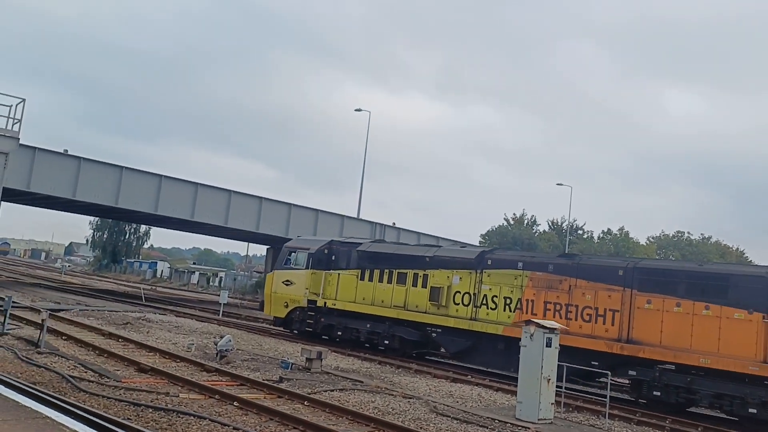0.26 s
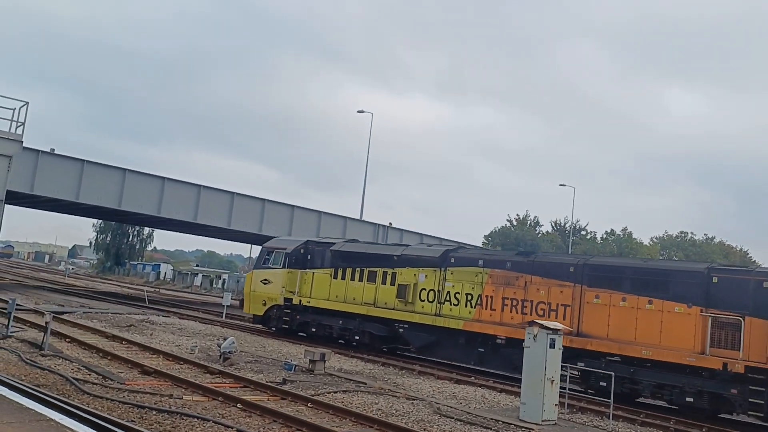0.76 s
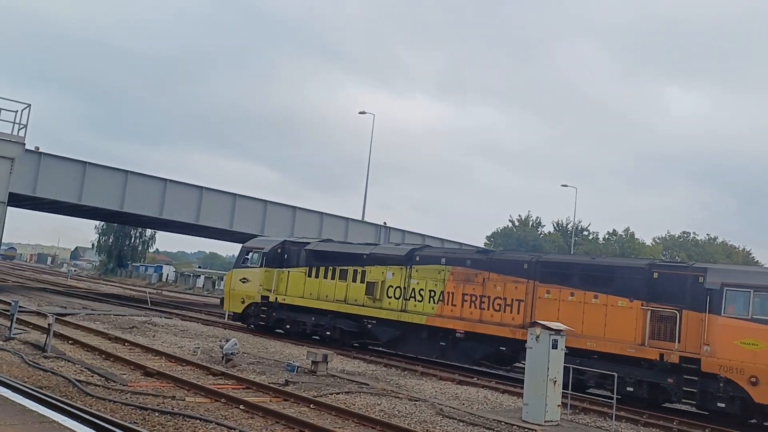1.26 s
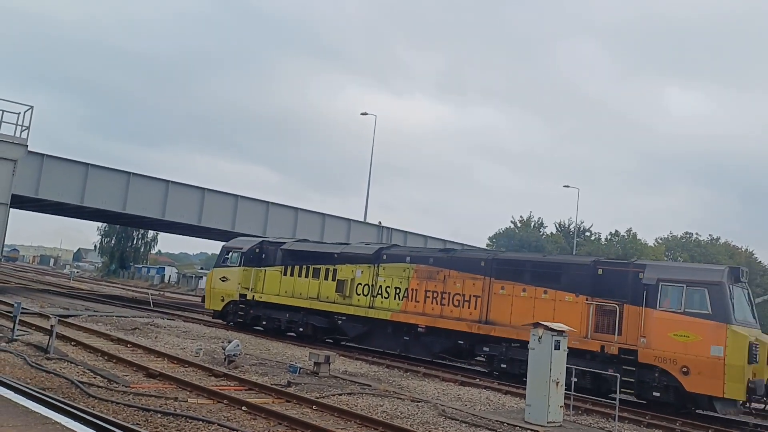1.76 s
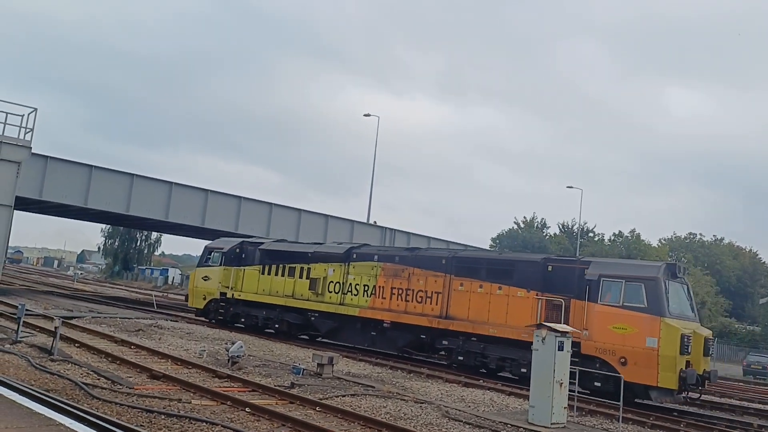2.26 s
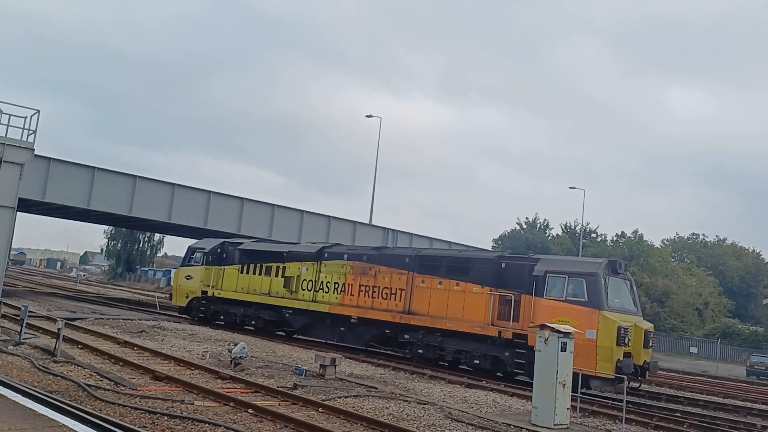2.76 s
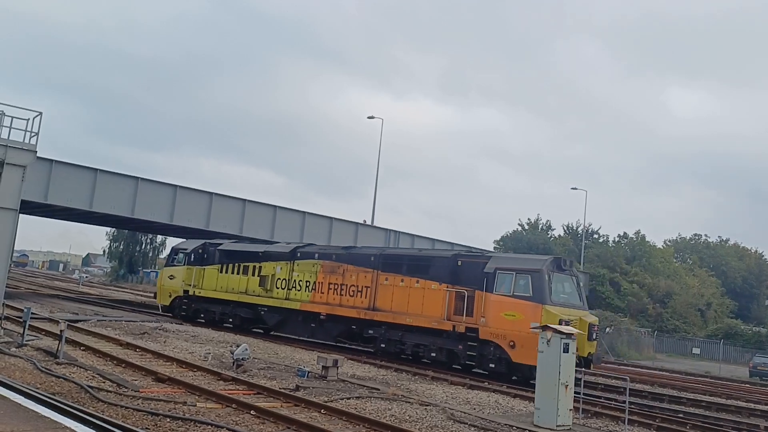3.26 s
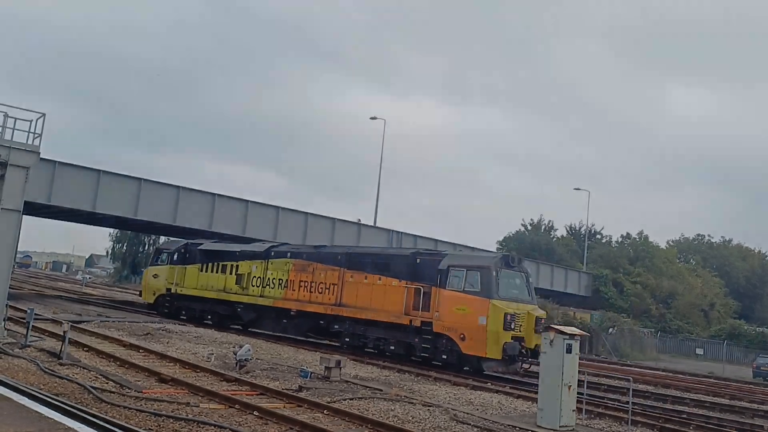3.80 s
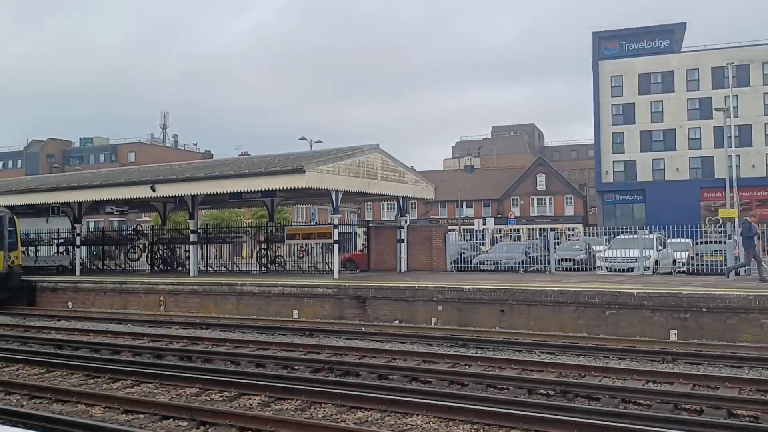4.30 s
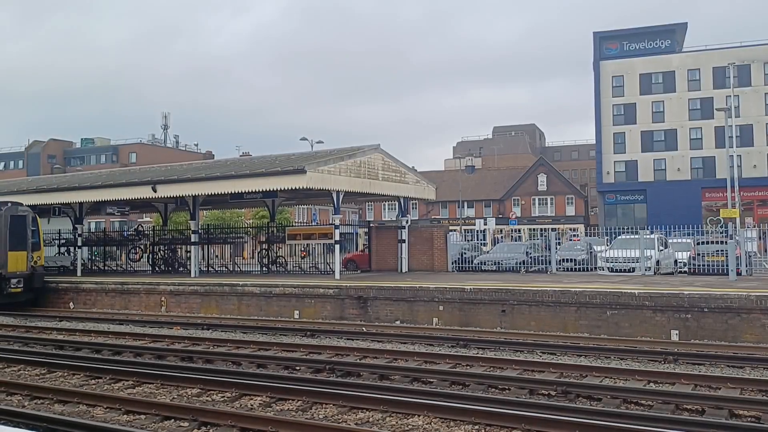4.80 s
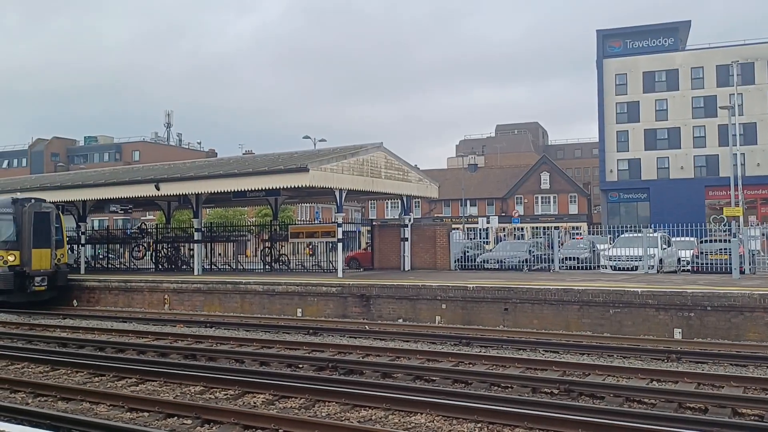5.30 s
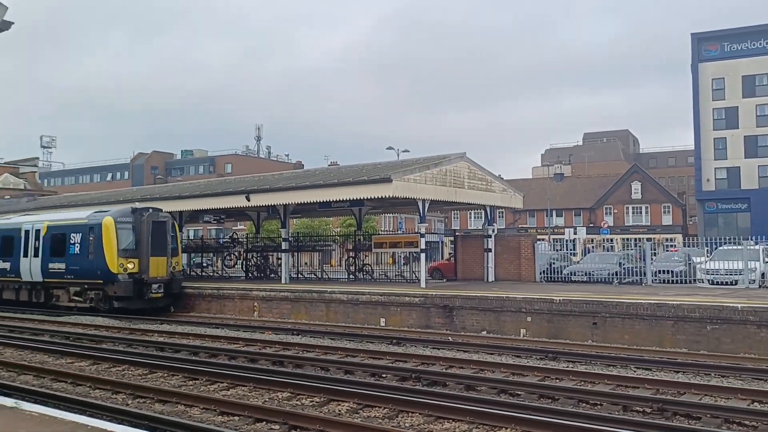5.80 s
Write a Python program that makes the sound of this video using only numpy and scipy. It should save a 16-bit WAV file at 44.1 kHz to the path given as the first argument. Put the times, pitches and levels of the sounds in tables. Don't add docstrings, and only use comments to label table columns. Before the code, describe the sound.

A trackside stereo microphone catches a throbbing diesel drone and broad wheel rumble. One piercing metallic squeal rings out early, followed by a cluster of heavy thumps, clatter and hollow booms as the locomotive crosses points. It eases away, fades and stops abruptly. After a tiny gap, a platform scene opens with softer diesel hum; an electric train approaches, its wheels hissing louder, with a joint thump, brief motor whine and faint brake rub.

```python
import sys
import numpy as np
from scipy import signal
from scipy.fft import rfft, irfft, next_fast_len
from scipy.io import wavfile
from scipy.ndimage import map_coordinates

SR = 44100
rng = np.random.default_rng(int(sys.argv[2]) if len(sys.argv) > 2 else 0)


def inscribe(sig):
    pcm = np.round(np.clip(np.atleast_2d(sig).T, -1, 1) * 32767)
    wavfile.write(sys.argv[1], SR, pcm.astype(np.int16))


def attenuation_scalar(level_db):
    decades = np.asarray(level_db, float) / 20
    return 10 ** decades


N = 266805
YARD_S, PLATFORM_S = (0, 4.0575), (4.222, 6.05)


def rms_one(x):
    return x / np.sqrt(np.mean(x ** 2) + 1e-20)


def in_time(rows, outside=None):
    s, *columns = np.transpose(rows)
    return [np.interp(np.arange(N) / SR, s, c, outside, outside) for c in columns]


def at_hz(points, hz):
    table_hz, value = np.array(points).T
    return np.interp(np.log(hz), np.log(table_hz), value)


def drift(rate, size=N):
    r = np.exp(-80 * np.pi * rate / SR)
    luck = rng.standard_normal(size // 40 + 2002)
    slow = signal.lfilter([1], [1, -2 * r, r * r], luck)[2000:]
    return np.interp(np.arange(size) / 40, np.arange(len(slow)), rms_one(slow))


def ring(drive, hz, t60):
    r, w = attenuation_scalar(-60 / (t60 * SR)), 2 * np.pi * hz / SR
    return signal.lfilter([0, np.sin(w)], [1, -2 * r * np.cos(w), r * r], drive + 1e-18)


def swell(start, attack, hold, db, fall_db):
    t = np.arange(N) / SR - start
    return np.clip(t / attack, 0, 1) * attenuation_scalar(db - fall_db * np.maximum(t - attack - hold, 0))


def tone(hz, gain, wobble_db, wander_hz):
    gain = gain * attenuation_scalar(wobble_db * drift(8.4))
    pitch = hz + wander_hz * drift(7.94)
    return np.sqrt(2) * gain * np.sin(2 * np.pi * np.cumsum(pitch) / SR)


# time_s, cycle_hz
ENGINE_CYCLE = [(0, 5.82), (1.5, 5.805), (4.1, 5.78), (4.2, 5.768), (6.05, 5.762)]
ENGINE_ORDERS = 7, 8, 9, 10, 11, 12, 13, 14, 15, 16, 17, 18, 19, 21, 22, 23, 24, 25, 26
# yard_start_db, yard_end_db, platform_db (rms)
ENGINE_LEVELS = [(-55.5, -61, -43), (-30.5, -39.5, -57.5), (-29.5, -53.5, -47), (-46.5, -53, -37.5),
                 (-21, -33, -37.5), (-42, -36.5, -44), (-28.5, -19, -26.5), (-43, -42, -34),
                 (-35.5, -33, -31.5), (-46.5, -39.5, -44.5), (-49.5, -58.5, -44.5), (-48.5, -47, -52),
                 (-28.5, -67, -45), (-44.5, -35.5, -34), (-50.5, -39, -56), (-46, -42, -45),
                 (-34, -34, -38), (-56.5, -39, -60), (-49, -49, -54)]
ECHO_ORDERS = 8, 11, 13, 15
# yard_share, yard_crest_s, platform_share, platform_crest_s
ENGINE_ECHOES = [(.3, 2.5, .1, 5.0), (0.059, .75, .2, 4.55), (0.48, 2.556, .35, 4.93),
                 (0.23, 2.82, .4, 5.3)]


def diesel():
    cycle, t = in_time(ENGINE_CYCLE)[0], np.arange(N) / SR
    turn, yard = 2 * np.pi * np.cumsum(cycle) / SR, t < YARD_S[1]
    pipe_smear = np.pi / 8
    yard_shift, platform_shift = .0152, .0175
    out = 0
    for order, (start_db, end_db, platform_db) in zip(ENGINE_ORDERS, ENGINE_LEVELS):
        db, = in_time([(0, start_db), (YARD_S[1], end_db), (PLATFORM_S[0], platform_db)])
        phase = order * turn + pipe_smear * order ** 2
        if order not in ECHO_ORDERS:
            out = out + attenuation_scalar(db + 1.6 * drift(1.2)) * np.sin(phase)
            continue
        share, crest, far_share, far_crest = ENGINE_ECHOES[ECHO_ORDERS.index(order)]
        shift = np.where(yard, yard_shift * (t - crest), platform_shift * (t - far_crest))
        echo = np.sin(phase + 2 * np.pi * shift * order * cycle)
        out = out + attenuation_scalar(db) * (np.sin(phase) + np.where(yard, share, far_share) * echo)
    return np.sqrt(2) * out


# time_s, pitch_hz
GEAR_PITCH = [(0, 224), (1, 243), (2, 257), (2.9, 269)]
# time_s, level_db (rms)
GEAR_LOAD = [(0, -34), (.6, -30), (1.4, -27), (2.2, -29), (2.9, -40)]
# start_s, hold_s, level_db (rms)
BODY_BOOMS = [
    (2.006, .2, -18),
    (2.36, 0.31, -24.5),
    (2.781, 0.077, -20.5),
    (3.047, 0.077, -24),
    (3.42, .12, -29),
    (3.675, 0.33, -26.5),
]


def whines():
    gear_hz, = in_time(GEAR_PITCH)
    gear_load, = in_time(GEAR_LOAD, outside=-120)
    jolts = np.max([swell(s, .075, hold, db, 69.5) for s, hold, db in BODY_BOOMS], axis=0)
    out = tone(gear_hz, attenuation_scalar(gear_load), 2.2, 0.51)
    out += tone(1.365 * gear_hz, swell(0, .2, .1, -32, 17), 2.7, 0.9)
    out += tone(277.3, jolts, 2.2, .7)
    out += tone(623, swell(0, .01, .01, -45, 1.5), 2.5, 2.5)
    out += tone(186, swell(2.68, .07, .06, -23, 70), 1.5, .6)
    out *= np.arange(N) / SR < YARD_S[1]
    return out + tone(242, swell(5.35, .25, .06, -30, 60), 1.5, 0.27)


def inverter():
    return tone(1268, swell(5.58, .04, .02, -39, 10), 1.8, 3.0) * [[.6], [1.3]]


# time_s, thump_peak_db, clatter_db
RAIL_JOINTS = [(1.963, -24.5, -24), (2.067, -3, -26), (2.655, -24, -29), (2.784, -4.5, -41),
               (2.835, -10, -28), (3.06, -9, -24), (3.286, -14, -18.5), (3.324, -17, -29.5),
               (3.382, -6.5, -20.5), (3.474, -19, -40), (5.268, -31, -30), (5.608, -9, -34)]
# pitch_hz, level_db, t60_s
RAIL_AND_BOGIE = [(189, -2.5, 0.082), (253, 9, 0.076), (297, -10, 0.037)]


def joints():
    out, blows, clatter = np.zeros(N), np.zeros(N), np.zeros(N)
    fade = np.exp(-np.arange(2000) / 450)
    for s, db, bright_db in RAIL_JOINTS:
        i = round(s * SR)
        blows[i] = attenuation_scalar(db - 16)
        clatter[i:i + 2000] += attenuation_scalar(bright_db - 5) * rng.standard_normal(2000) * fade
    for hz, db, t60 in RAIL_AND_BOGIE:
        out += attenuation_scalar(db) * ring(blows, hz, t60)
    soft = signal.sosfilt(signal.butter(2, 420, fs=SR, output="sos"), out)
    band = signal.butter(4, [400, 2200], "band", fs=SR, output="sos")
    return soft + 1.4 * signal.sosfilt(band, clatter)


def load(bogies, nearness, shares):
    t = np.arange(N) / SR
    bumps = sum(np.outer([rumble_db, grind_db], np.exp(-((t - s) / half) ** 2))
                for s, half, rumble_db, grind_db in bogies)
    rumble_shares, grind_shares = (0.19, 0.99, 0.057, .02), (.1, 0.011, 0.47, 1.0)
    return np.transpose([rumble_shares, grind_shares, shares]) @ np.vstack([bumps, in_time(nearness)])


def rolling(span, levels, centres_hz, colour, peaks, alike, pan, patchy_db):
    start, size = round(span[0] * SR), round((span[1] - span[0]) * SR)
    length = next_fast_len(size)
    hz = np.maximum(np.arange(length // 2 + 1) * SR / length, 1)
    shape_db = at_hz(colour, hz)
    shape_db = shape_db + sum(db / (1 + (2 * (hz - f) / width) ** 2) for f, width, db in peaks)
    mid, side = rfft(rng.standard_normal((2, length)))
    like = np.clip(at_hz(alike, hz), -.99, .99)
    pair = np.sqrt(1 + like) * mid + np.sqrt(1 - like) * side * [[1], [-1]]
    pair = pair * attenuation_scalar(at_hz(pan, hz) / 2 * [[1], [-1]])
    pair = pair * attenuation_scalar(shape_db) * np.sqrt(SR / 4)
    levels = levels[:, start:start + size]
    levels = levels - np.median(levels, axis=1, keepdims=True)
    levels = np.vstack([levels, np.minimum(levels[2], 0)])
    out, together = np.zeros((2, N)), drift(18, size=size)
    for centre in 25 * 2 ** np.arange(0, 10, .5):
        window = np.clip(1 - 2 * np.abs(np.log2(hz / centre)), 0, 1)
        shares = [np.interp(np.log(centre), np.log(centres_hz), row) for row in np.eye(5)]
        flicker_db = patchy_db * (.4 * together + drift(14, size=size))
        gain = attenuation_scalar(shares @ levels + flicker_db)
        out[:, start:start + size] += gain * irfft(pair * window, length)[:, :size]
    return out


# time_s, half_length_s, rumble_db, grind_db
YARD_BOGIES = [
    (.05, .15, 5, 0.5),
    (1.6, .2, -6.5, -0.6),
    (2.13, 0.15, 5, 0),
    (3.0, 1.37, 4.5, -4.5),
    (2.8, 0.13, 8, .5),
    (3.36, .13, 7, 2.5),
]
# time_s, level_db
YARD_NEARNESS = [(0, -4.5), (3.3, -4.5), (4.061, -8)]
YARD_CENTRES = [120, 230, 700, 3000, 14000]
# pitch_hz, level_db (per Hz)
YARD_NOISE = [(20, -72), (33, -69), (45, -58), (70, -53),
              (100, -51), (160, -51), (210, -48), (300, -51.5), (400, -68), (640, -60), (1300, -67.5),
               (1700, -75.5), (4000, -86.5), (7000, -89), (9500, -100.2), (15800, -103.4)]
# pitch_hz, width_hz, level_db
YARD_PEAKS = [(415, 140, 1.5), (963.6, 41, -14), (1280, 108, 6.5), (2770, 310, 5), (4860, 160, 6),
              (5880, 230, 9), (9760, 1500, -7), (11800, 2000, 1.5)]
# pitch_hz, likeness (-1 to 1)
YARD_ALIKE = [(60, -0.67), (130, 0.98), (290, 0.91), (640, 0.78), (1410, 0.52), (3100, 0.55), (6820, 0.11),
              (15000, 0.3)]
# pitch_hz, level_db
YARD_PAN = [(60, -3.5), (110, 2.5), (200, -0.7), (380, 0.4), (700, -1.6), (1290, -3), (2380, 0),
            (4400, -3.5), (8120, -1.2), (15000, -1.5)]


def locomotive_rolling():
    levels = load(YARD_BOGIES, YARD_NEARNESS, shares=(0.66, .05, 0.31, 1.0))
    return rolling(YARD_S, levels, YARD_CENTRES, YARD_NOISE, YARD_PEAKS,
                   YARD_ALIKE, YARD_PAN, patchy_db=.8)


# time_s, half_length_s, rumble_db, grind_db
PLATFORM_BOGIES = [
    (4.38, 0.12, 6.3, 0.38),
    (5.62, 0.034, 4.1, 0.37),
]
# time_s, level_db
PLATFORM_NEARNESS = [(4.22, -8), (4.9, -6.5), (5.23, -6.5), (5.28, -1), (5.6, 1), (5.7, -.5), (5.92, 1),
                     (6.05, -.5)]
PLATFORM_CENTRES = [120, 250, 800, 5500, 8200]
# pitch_hz, level_db (per Hz)
PLATFORM_NOISE = [(20, -75), (33, -64), (45, -59), (70, -52),
                  (100, -50.5), (160, -60.5), (250, -52.5), (350, -61), (600, -66), (1300, -70.5),
                   (2200, -80), (5500, -89.5), (7000, -97.5), (9300, -104.6), (12000, -104.5),
                   (15800, -106.8)]
# pitch_hz, width_hz, level_db
PLATFORM_PEAKS = [(176, 25, 1), (3220, 1100, 1.3), (5560, 630, 5.9), (7740, 590, 4.6)]
# pitch_hz, likeness (-1 to 1)
PLATFORM_ALIKE = [(60, 0.68), (130, 0.86), (290, 0.97), (640, 0.51), (1400, 0.45), (3100, 0.71),
                  (6800, 0.04), (15000, .3)]
# pitch_hz, level_db
PLATFORM_PAN = [(60, 3), (110, 0), (200, 0.5), (380, 0), (700, -1.5), (1290, -5), (2380, -7), (4400, -13),
                (8120, 4), (15000, 8.5)]


def train_rolling():
    levels = load(PLATFORM_BOGIES, PLATFORM_NEARNESS, shares=(.5, .1, .35, 1.1))
    return rolling(PLATFORM_S, levels, PLATFORM_CENTRES, PLATFORM_NOISE, PLATFORM_PEAKS,
                   PLATFORM_ALIKE, PLATFORM_PAN, patchy_db=.7)


# start_s, hold_s, pitch_hz, glide_hz_per_s, level_db (rms)
SUNG_NOTES = [
    (0.84, 0.0084, 2725, -300, -34.5),
    (0.877, 0.068, 2165, -200, -36),
    (0.957, 0.11, 1884, 293.5, -39),
]


def sung_notes():
    out, t = 0, np.arange(N) / SR
    for s, hold, hz, glide, db in SUNG_NOTES:
        pitch = hz + glide * np.clip(t - s, 0, .2)
        out = out + tone(pitch, swell(s, 0.021, hold, db, 255), 3.1, 2.4)
    s, hold, hz, glide, db = SUNG_NOTES[0]
    overtones = sum(np.sin(2 * np.pi * k * hz * t) / k ** .5 for k in range(2, 6))
    return out + swell(s, .015, .003, db - 3, 698.5) * overtones


# start_s, attack_s, hold_s, level_db, fall_db_per_s
FLANGE_BITES = [
    (.842, .022, .1, 1.5, 80),
    (1.25, .03, .03, -15, 130),
]
WHEEL_PITCHES = (2579, 3235, 3806, 4032, 4385, 4705, 5010, 5389, 5660, 6372, 6645, 7133, 7897, 8272, 8683,
                 9950, 10223, 10966, 11466, 11978, 12532, 13119, 13920, 14112, 14174, 14648, 14739, 15235,
                 15493)
# level_db (rms), t60_s
WHEEL_RINGS = [(-44.5, .5), (-46.5, 0.9), (-40.5, 1.22), (-50.5, 1.5), (-67, .8), (-44, 0.3), (-43, 0.18),
               (-46.5, .4), (-51, 0.98), (-42.5, 0.86), (-65, 0.74), (-56.5, .8), (-52, 0.66), (-46.5, .6),
               (-65.5, .8), (-51, 0.51), (-57, 0.83), (-66, .8), (-53.5, 1.0), (-50, 0.36), (-51, .7),
               (-53, .5), (-59.5, .8), (-53, 0.55), (-53, .6), (-64.5, .7), (-58, .9), (-64, 1.1),
               (-65, .5)]
# pitch_hz, level_db
RUB_COLOUR = [(1500, -29), (2500, 5.5), (5000, -10), (7000, -13), (9300, -14), (10500, -6), (14000, -9.5),
              (16000, -16)]


def squeal():
    rub = sum(swell(*row) for row in FLANGE_BITES)
    out, span = np.zeros(N), slice(round(.8 * SR), round(2.2 * SR))
    size = span.stop - span.start
    for hz, (db, t60) in zip(WHEEL_PITCHES, WHEEL_RINGS):
        grip = np.roll(rub, 3600) if hz in (3235, 3806) else rub
        split_hz = hz + rng.uniform(4.0, 21)
        first, second = [ring(grip[span] * rng.standard_normal(size), f, t60) for f in (hz, split_hz)]
        note = rms_one(first) + .9 * rms_one(second)
        out[span] += attenuation_scalar(db) * note / np.std(note[3500:13000])
    for hz in rng.uniform(0, 1, 140) ** .6 * 12400 + 3400:
        note = ring(rub[span] * rng.standard_normal(size), hz, .42 * attenuation_scalar(rng.normal(0, 4)))
        db = at_hz(RUB_COLOUR, hz) - 45 + rng.normal(0, 3)
        out[span] += attenuation_scalar(db) * note / np.std(note[3500:9000])
    hz = np.maximum(np.arange(N // 2 + 1) * SR / N, 1)
    hiss = rms_one(irfft(rfft(rng.standard_normal((2, N))) * attenuation_scalar(at_hz(RUB_COLOUR, hz)), N))
    out += sung_notes()
    left_echo, right_echo = .55 * np.roll(out, 213), .55 * np.roll(out, 341)
    late = irfft(rfft(out) * np.exp(-2j * np.pi * hz * 2.31 / SR), N)
    return np.array([late + left_echo, out + right_echo]) + attenuation_scalar(-43) * rub * hiss


# start_s, attack_s, hold_s, level_db (rms), fall_db_per_s
BRAKE_TOUCHES = [
    (0, 0.0036, .01, -62.5, 17.5),
    (5.548, .05, .005, -58, 250),
    (5.76, .15, .2, -57.5, 50),
]


def brake():
    band = signal.butter(2, [10000, 13500], "band", fs=SR, output="sos")
    hiss = rms_one(signal.sosfilt(band, rng.standard_normal((2, N))))
    return sum(swell(*row) for row in BRAKE_TOUCHES) * attenuation_scalar([[2.5], [-2.5]]) * hiss


# start_s, attack_s, hold_s, level_db (rms), fall_db_per_s
RAIL_SONGS = [
    (3.17, 0.079, 0.11, -43.5, 150),
    (3.4, 0.15, .01, -49, .1),
]


def rail_song():
    band = signal.butter(2, (1850, 2300), "band", fs=SR, output="sos")
    hiss = rms_one(signal.sosfilt(band, rng.standard_normal((2, N))))
    yard = np.arange(N) < YARD_S[1] * SR
    return yard * sum(swell(*row) for row in RAIL_SONGS) * hiss


# time_s, peak_db
METAL_TICKS = [(0.1176, -35), (0.172, -42), (0.4678, -43), (0.519, -48), (1.729, -42.5), (1.886, -55),
               (1.9862, -39.5), (2.4604, -48), (2.523, -43.5), (2.8986, -22.5), (2.924, -36.5), (3.2, -47),
               (3.5245, -38), (3.8694, -59)]
# pitch_hz, level_db, t60_s
TICK_RINGS = [(7270, 5, 0.016), (12500, -5.5, .014), (14000, -11, .008)]


def ticks():
    snaps, n = np.zeros((2, N)), np.arange(2000)
    snap_and_rattle = np.exp(-n / 70) + .24 * np.exp(-n / 600)
    for s, db in METAL_TICKS:
        i = round(s * SR)
        snaps[:, i:i + 2000] += attenuation_scalar(db) * rng.standard_normal((2, 2000)) * snap_and_rattle
    band = signal.butter(3, [7200, 14500], "band", fs=SR, output="sos")
    out = attenuation_scalar(-5.0) * signal.sosfilt(band, snaps)
    for hz, db, t60 in TICK_RINGS:
        out += attenuation_scalar(db - 30.5) * ring(snaps, hz, t60)
    return out


# time_s, lag_samples
LEFT_LAG = [(0, 7), (2, 1), (4.06, -1), (4.2, -13.5), (6.05, -12)]


def delay_left(pair):
    lag, = in_time(LEFT_LAG)
    left = map_coordinates(pair[0], [np.arange(N) - lag], order=3, mode="nearest")
    return np.array([left, pair[1]])


def bow_to_squeal():
    since = np.maximum(np.arange(N) / SR - 0.883, 0)
    return attenuation_scalar(-3.5 * np.minimum(since / 0.039, 1) * np.exp(-since / 0.22))


def scene():
    out = (diesel() + whines() + joints()) * attenuation_scalar([[-.3], [.3]]) + inverter()
    out += locomotive_rolling() + train_rolling()
    return delay_left(out) * bow_to_squeal() + squeal() + brake() + ticks() + rail_song()


def roll_off(x):
    return signal.sosfilt(signal.butter(12, 15960, fs=SR, output="sos"), x)


def record(dry):
    t = np.arange(N) / SR
    gate = (t < YARD_S[1]) + np.clip((t - PLATFORM_S[0]) / 0.03, 0, 1)
    fade_db, = in_time([(3.55, 0), (YARD_S[1], -5), (PLATFORM_S[0], -9), (PLATFORM_S[0] + .13, 0)])
    return roll_off(dry * gate * attenuation_scalar(fade_db))


dry = scene()
out = record(dry)
inscribe(out)
```